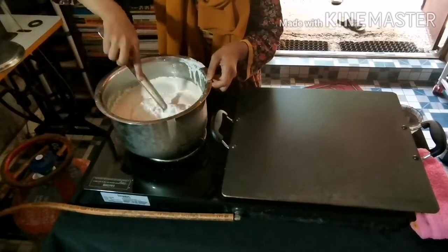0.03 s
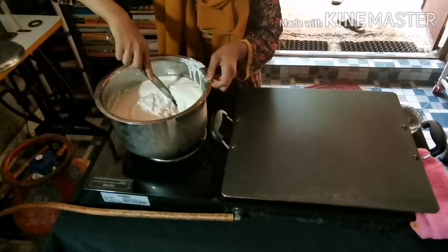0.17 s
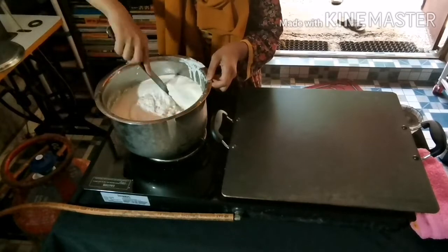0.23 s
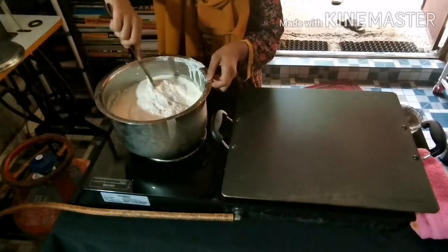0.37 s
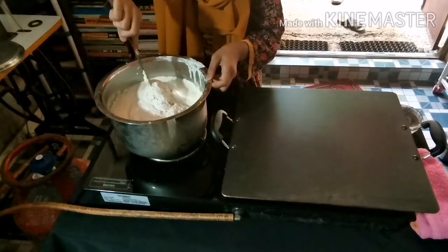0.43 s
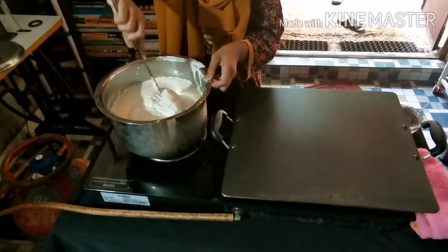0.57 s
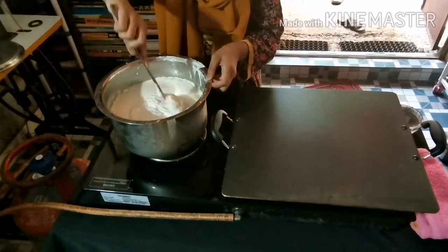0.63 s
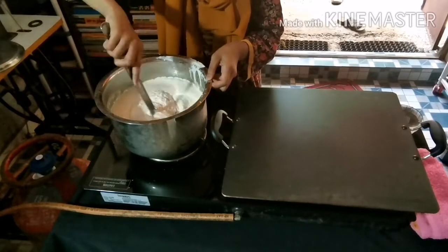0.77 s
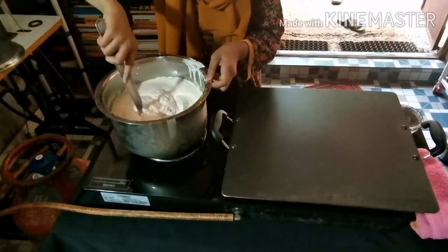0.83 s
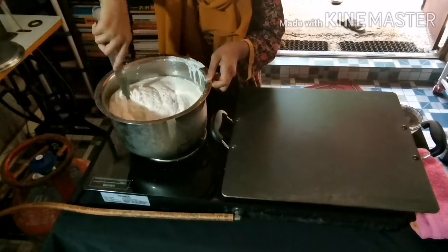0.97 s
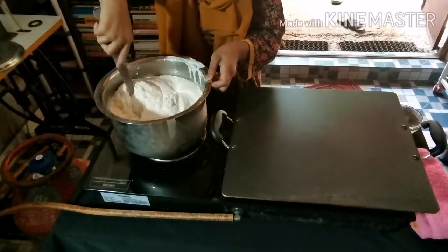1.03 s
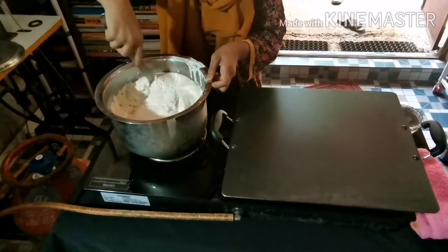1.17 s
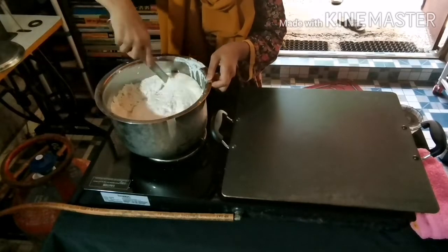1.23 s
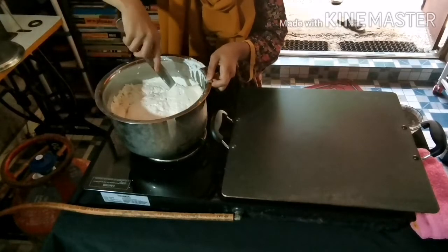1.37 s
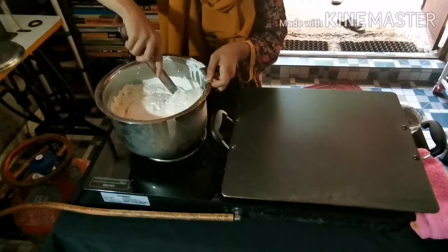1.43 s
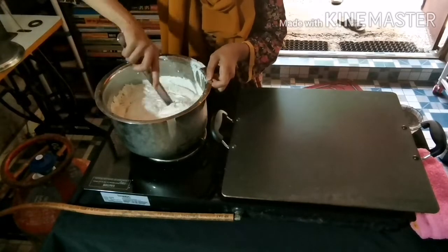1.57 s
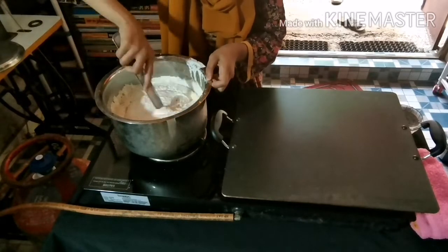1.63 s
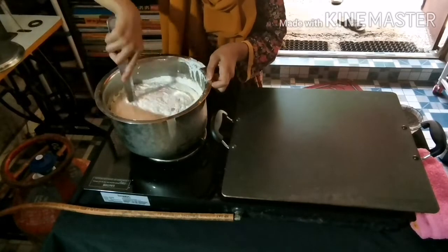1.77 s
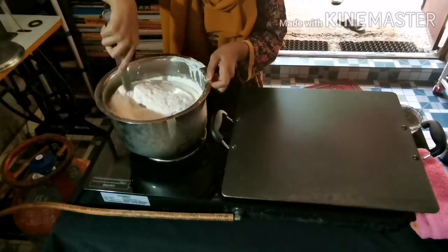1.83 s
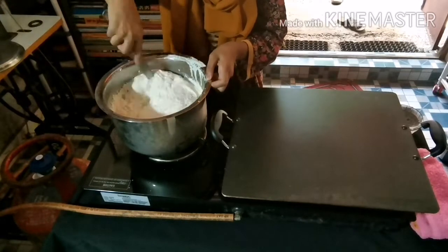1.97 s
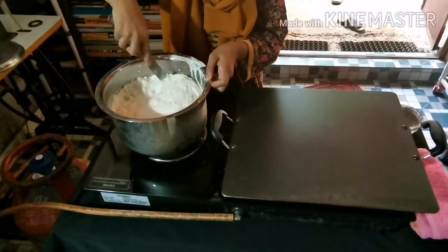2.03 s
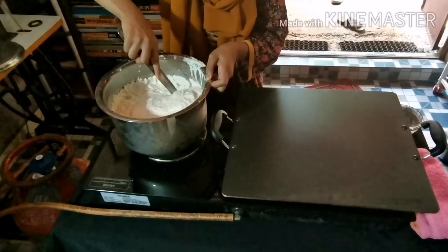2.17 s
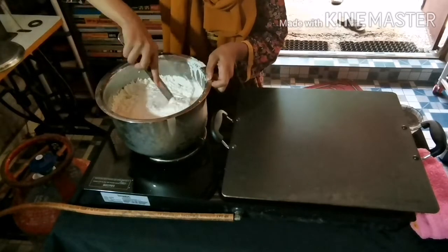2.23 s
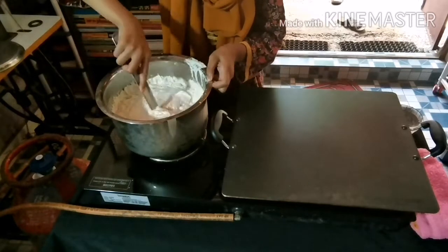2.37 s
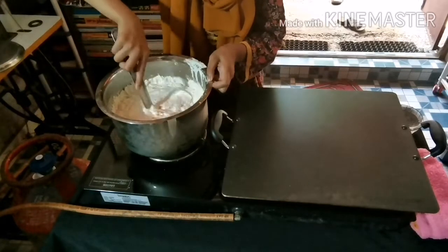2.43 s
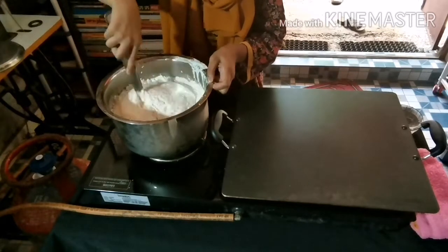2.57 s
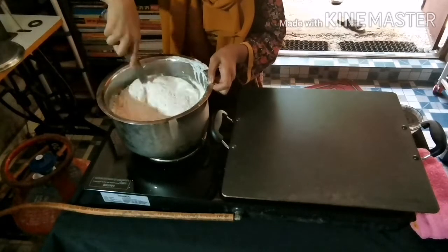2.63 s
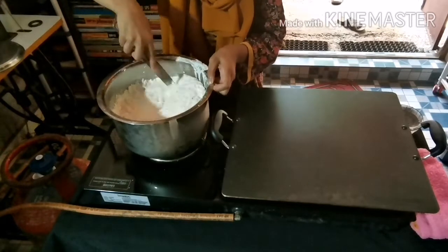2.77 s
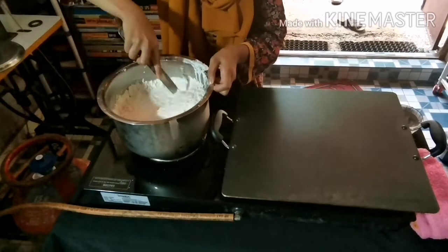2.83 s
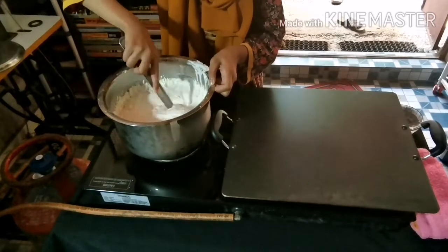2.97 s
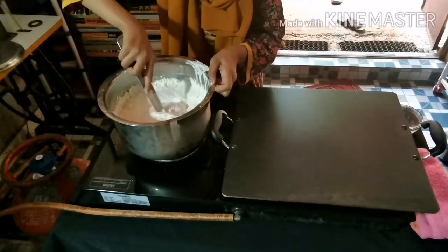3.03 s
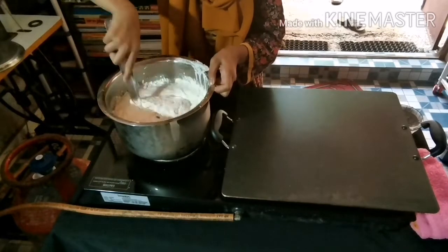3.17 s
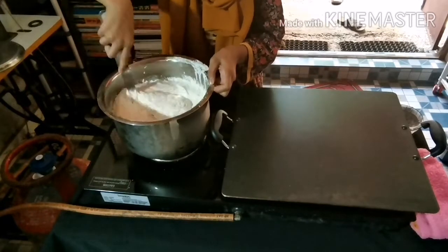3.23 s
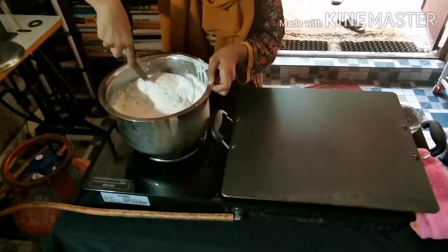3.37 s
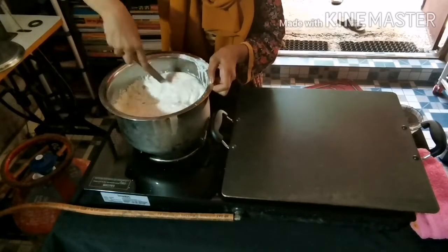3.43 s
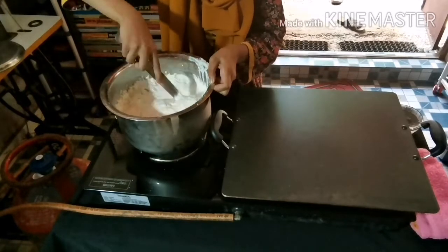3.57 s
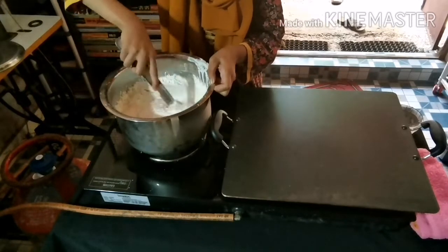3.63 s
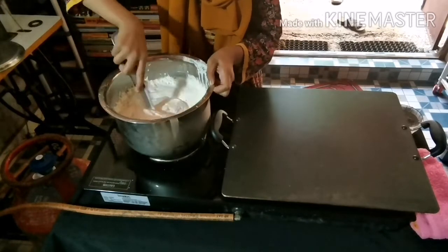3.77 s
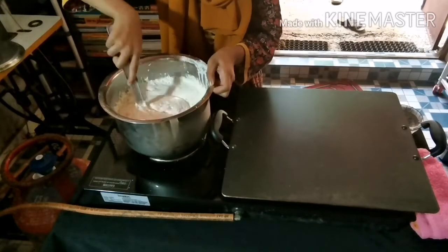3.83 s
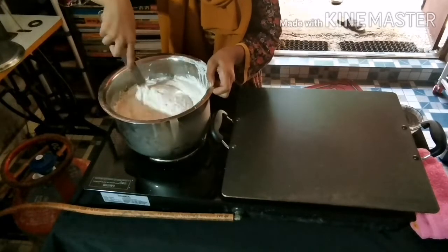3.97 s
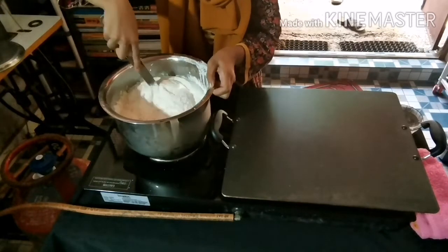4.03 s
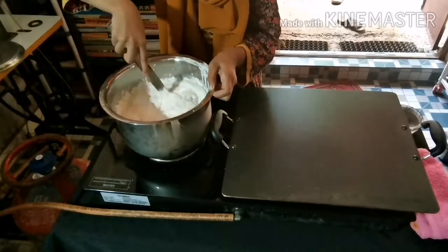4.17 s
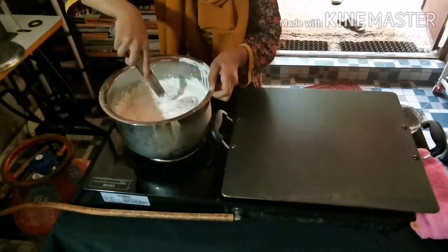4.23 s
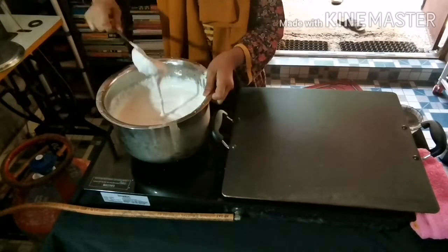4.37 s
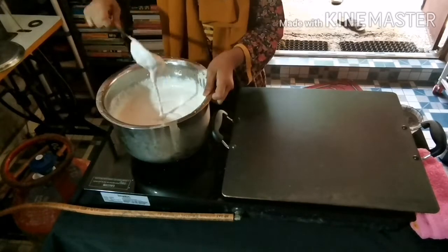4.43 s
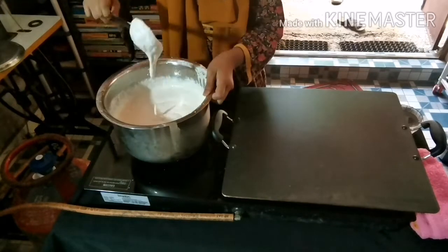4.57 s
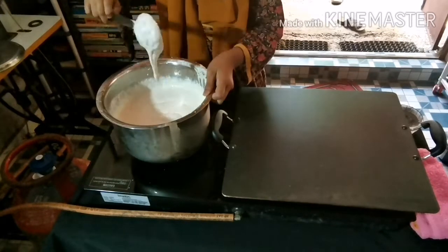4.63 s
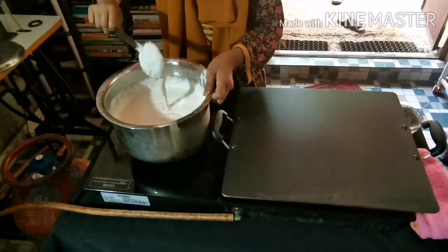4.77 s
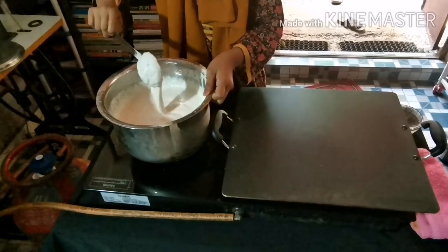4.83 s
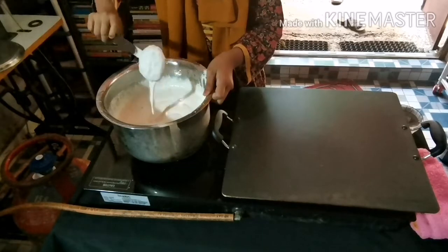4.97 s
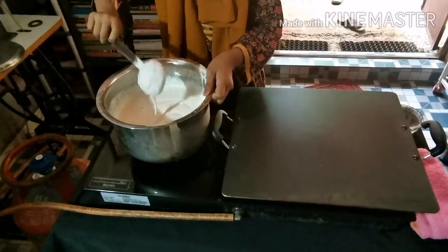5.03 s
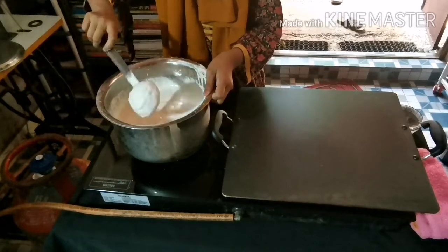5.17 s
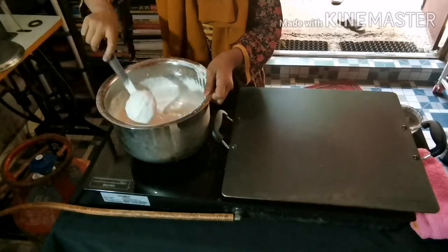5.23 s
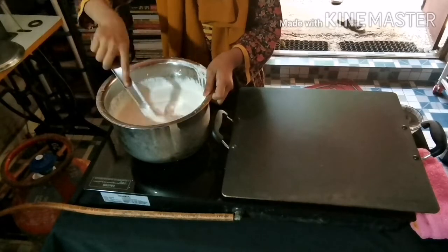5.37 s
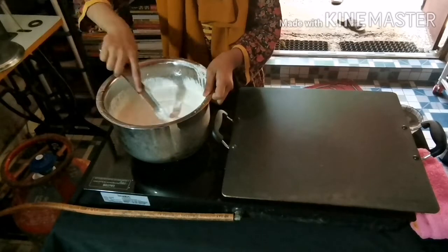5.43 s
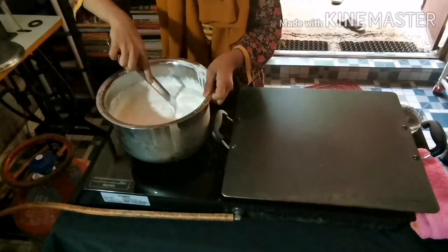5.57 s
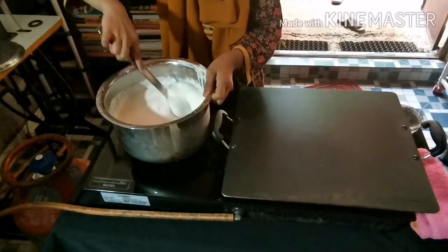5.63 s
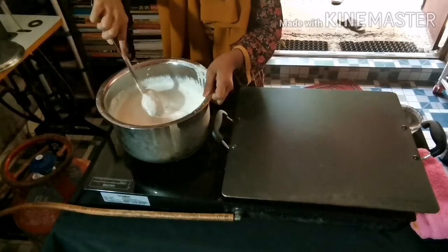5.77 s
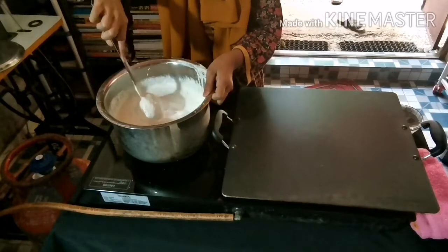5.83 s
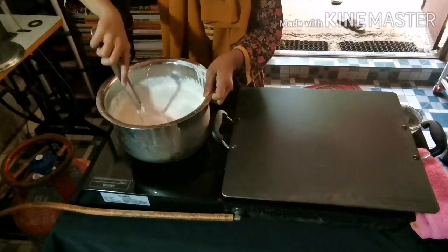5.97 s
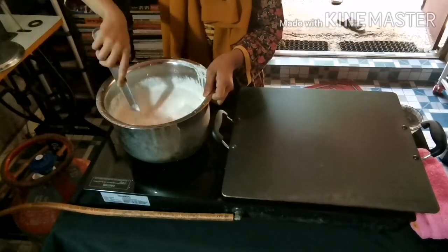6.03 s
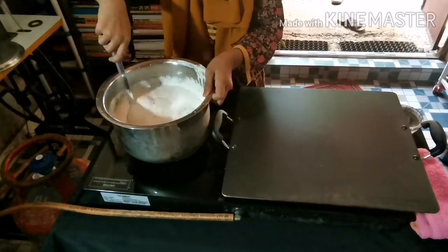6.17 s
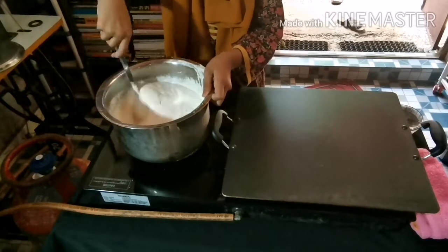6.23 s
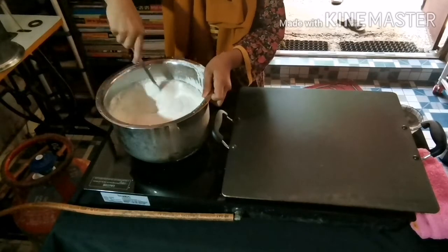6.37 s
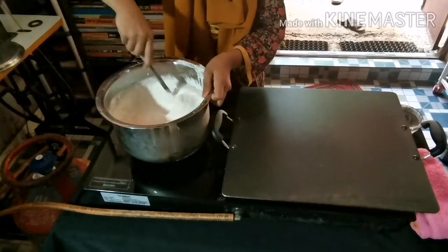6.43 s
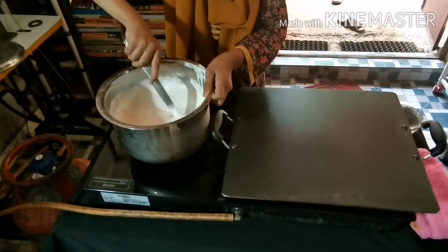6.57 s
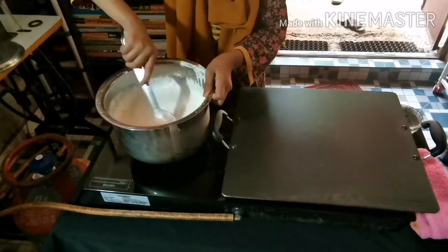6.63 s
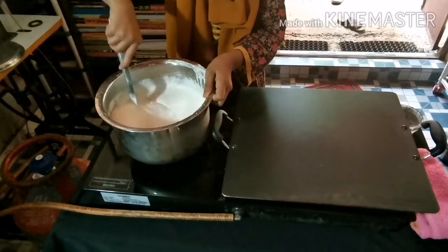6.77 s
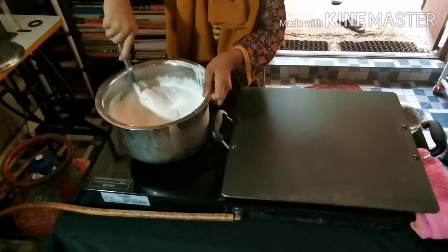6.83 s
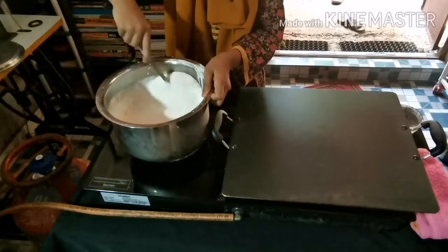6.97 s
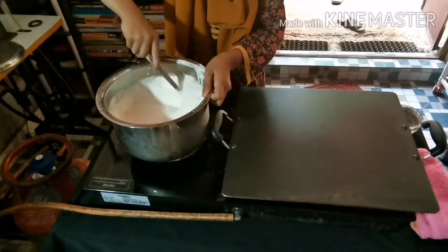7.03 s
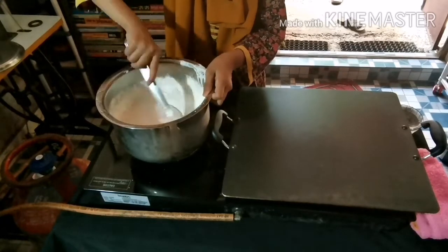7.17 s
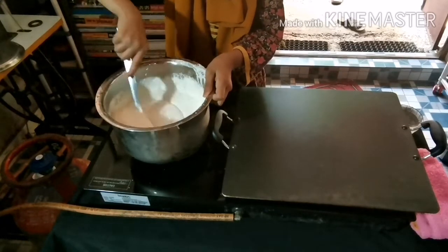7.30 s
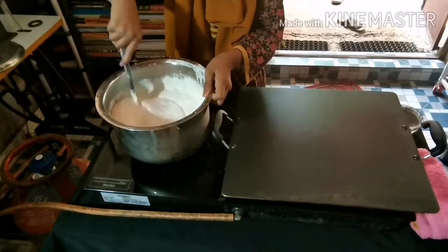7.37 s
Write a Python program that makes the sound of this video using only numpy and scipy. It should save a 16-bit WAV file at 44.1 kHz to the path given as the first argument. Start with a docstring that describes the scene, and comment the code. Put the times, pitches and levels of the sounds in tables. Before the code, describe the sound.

A steel spoon stirs thick batter in a steel pot, making dull, uneven knocks that barely ring. Between them come soft scrapes, thin squeaks, low sloshing and faint sleeve rustle. Past the middle the knocking pauses while batter dribbles back, then returns in a louder, quicker run. The pot sits slightly left of the stereo microphones in a small tiled kitchen with a short echo.

```python
"""Dull knocks, scrapes and thick sloshing: a steel spoon stirs batter in a steel pot on a stove.
The spoon hits the wall and floor of the pot, and the batter stops the ringing almost at once.
Its edge drags and squeaks along the steel; once it is lifted and batter pours back.
Sleeves rustle, the stove sways once, and the small tiled kitchen echoes briefly and murmurs underneath.
Two microphones close together hear it all, with the pot a little to the left."""
import sys
import numpy as np
from scipy import signal
from scipy.fft import rfft, irfft, next_fast_len
from scipy.io import wavfile
from scipy.ndimage import uniform_filter1d

SR = 44100
rng = np.random.default_rng(int(sys.argv[2]) if len(sys.argv) > 2 else 0)


def wrap_up_sound(samples):
    """Save the sound to the file named by the first command line argument, as 16-bit audio."""
    columns = np.atleast_2d(samples).T
    # keep every value between -1 and 1, then stretch to whole-number steps
    tamed = np.clip(columns, -1, 1)
    steps = np.round(tamed * 32767).astype(np.int16)
    wavfile.write(sys.argv[1], SR, steps)


N = 327042

# The tones the filled pot rings with: f/Hz, level/dB, t60/s (the time to fade by 60 dB)
POT_TONES = [(122, -4, .1), (161, 0, .08), (214, 0, .06), (278, -2, .08), (348, -2, .05), (420, 0, .05),
             (480, -2, .04), (565, -3, .04), (662, 0, .05), (785, -2, .04), (875, -3, .03), (1001, -5, .03),
             (1095, -4, .03), (1175, -4, .03), (1497, -3, .025), (1657, -4, .025), (2190, 1, .016),
             (2330, -2, .012), (2573, -3, .012), (3450, -6, .012), (3830, -7, .012), (4264, -11, .03),
             (4980, -10, .012)]
# Strokes of the spoon: t/s, length/s, drag level/dB, centre of the scrape/Hz, slosh level/dB
SPOON_STROKES = [(0.082, 0.16, -64.5, 820, -58), (0.448, 0.087, -78, 790, -72), (.76, 0.08, -76, 800, -64),
                 (0.91, 0.3, -68.5, 850, -62), (1.499, 0.083, -76, 680, -57.5),
                 (1.725, .27, -59.5, 700, -58.5), (2.393, 0.041, -62.5, 716, -62),
                 (2.533, .1, -67.5, 600, -60.5), (2.925, 0.046, -64, 665, -65),
                 (3.031, 0.12, -70, 655, -58.5), (3.161, 0.11, -59.5, 660, -54.5),
                 (3.285, 0.12, -57, 668, -55), (3.586, 0.17, -66, 660, -53), (3.864, 0.037, -62, 635, -62),
                 (4.093, 0.12, -50, 570, -46.5), (4.274, 0.23, -67, 665, -65), (4.57, 0.15, -75, 1050, -69),
                 (4.753, 0.076, -81, 990, -56), (4.868, 0.065, -70, 800, -60),
                 (5.032, 0.25, -79.5, 630, -67), (5.734, 0.028, -79, 745, -81),
                 (5.992, 0.03, -64.5, 560, -57), (6.368, 0.16, -76, 770, -66.5),
                 (6.773, 0.018, -64.5, 705, -53), (7.226, 0.14, -72, 710, -80)]
STROKE_RISE_S, STROKE_T60_S = 0.01, 0.29


def spoon_knocks():
    """Each knock rings the batter-damped pot; where and how hard it lands makes it dull or bright."""
    # Knocks: t/s, body level/dB, then from low to high, relative to the body:
    # stove thump/dB, thud/dB, clank/dB, tick/dB
    hits = [(0.193, -34.5, 9, 3, -1, -40), (0.886, -49.5, -9, -20, -1.5, -13),
            (1.066, -40, 12, -2, -3.5, -35), (1.232, -21.5, -12.5, -2, -1, -4.5),
            (1.763, -56, -20, -18, -2, -24), (1.924, -41, -10, -2, -12, -27), (2.033, -28.5, 0, 7, 1, -1.5),
            (2.222, -53, 12.5, 8, -4, -13), (2.27, -21.5, -39, -14, -0.5, -24),
            (2.655, -40, 15, -4.5, -7, -49), (2.711, -43, -19, -1, -9.5, -24),
            (2.759, -29.5, 0.5, 1.5, -3, -5), (2.898, -44.5, 3, -8, -16, -20),
            (3.155, -34, 1, -22, -12.5, -61), (3.281, -50, -14, -25, -4, -11),
            (3.346, -45, 4.5, 18.5, -3.5, -15), (3.388, -49, 6, 15.5, -19, -21),
            (3.437, -39.5, -10, -5, -18, -21), (3.489, -25, 1, 2.5, 0, -3), (3.509, -39, 1, 13, -1, -1),
            (3.728, -47, 9, 12.5, -9, -19), (3.89, -40, -11, -12.5, -25, -31),
            (3.949, -49, -27, -19, -20, -39), (4.066, -52.5, 30, 13, -6, -29),
            (4.094, -28.5, -18, -14.5, -1, -45), (4.136, -31, -43, 5.5, -7, -38),
            (4.911, -49.5, -7, -29, 7, -19), (5.5, -46.5, 12.5, -8, -0.5, -26),
            (5.766, -54.5, -16, -22, -12, -17), (5.994, -47.5, -23, 3, -25, -39),
            (6.091, -33.5, 11, 0.5, -13.5, -64), (6.239, -27.5, -24, -2.5, 4, -29),
            (6.503, -18.5, 0, 2.5, -5, -10.5), (6.547, -25, -4, -10, -2, -27),
            (6.846, -25.5, 3.5, -43, -13, -5.5), (6.852, -21, 2, -3, 6.5, -14.5),
            (6.917, -28.5, -7, -12, 0.5, -22), (7.054, -17.5, -11.5, -2.5, -6.5, -11),
            (7.103, -25.5, -37, -1, 8, -31), (7.159, -48.5, 21.5, -3.5, -12, -6),
            (7.348, -58.5, 19.5, -1, 3, -24)]
    length = SR // 2
    out, t = np.zeros((2, N + length)), np.arange(length) / SR
    hz, level, t60 = np.transpose(POT_TONES)[:, :, None]
    signs = (-1.) ** np.arange(len(POT_TONES))[:, None]
    for start, body_db, thump_db, thud_db, clank_db, tick_db in hits:
        strength = signs * amp(level + 2 * rng.standard_normal(hz.shape))
        ring = np.sum(strength * amp(-60 * t / t60) * np.sin(2 * np.pi * hz * t), axis=0)
        ring *= 1 - np.exp(-t / (.00003 * amp(-clank_db)))  # batter cushions the dull knocks
        crack = rng.standard_normal(length) * amp(3 - 60 * t / .006)  # the wall's many short-lived tones
        crack[0] += amp(26)  # steel meets steel
        knock_db = 0.45 * clank_db
        hollow_db = (knock_db + clank_db) / 2 - 6.5  # the pot is quiet between knock and clank
        clink_db = 4 + 0.48 * tick_db + 0.52 * clank_db
        colour = [(30, thump_db - 43), (70, thump_db - 10), (130, thump_db), (330, thud_db), (670, 0.33),
                  (1150, knock_db), (1550, hollow_db), (2300, clank_db), (4000, clink_db),
                  (6500, tick_db), (10500, tick_db - 10), (13000, tick_db - 13), (15500, tick_db - 33)]
        blow = amp(body_db - 2.5) * shape_tone(ring + crack, colour)
        out[:, round(start * SR):][:, :length] += from_left(blow) + amp(-2) * kitchen_echo(blow)
    return out[:, :N]


def spoon_drag():
    """The spoon's edge catches in tiny uneven slips; its place on the wall picks which tones sing."""
    # The band of sound around a scrape's centre: f/centre, level/dB
    scrape_band = [(.4, -80), (.8, 4.5), (1, 6), (1.2, -3.5), (3, -15.5), (6, -49)]

    def steel(f):
        """How strongly the pot answers at each frequency: one peak for each of its tones."""
        response = 0
        for k, (hz, db, t60) in enumerate(POT_TONES):
            damping = 1j * f * 1.2 / t60
            response += (-1) ** k * amp(db) * damping / (hz * hz - f * f + damping)
        return response + 2.7  # some of the rubbing passes straight through

    slips = rng.standard_normal(N) * amp(2.5 * rng.standard_normal(N))
    slips *= rng.random(N) < .1  # about one sample in ten slips
    centres_hz = np.array([580, 665, 800, 1100])
    starts, _, _, stroke_hz, _ = np.transpose(SPOON_STROKES)
    current_stroke = np.clip(np.searchsorted(starts, np.arange(N) / SR) - 1, 0, None)
    place = np.interp(stroke_hz[current_stroke], centres_hz, np.arange(len(centres_hz)))
    rub = np.zeros(N)
    for k, centre in enumerate(centres_hz):
        scrape = unit(filtered(slips, lambda f: steel(f) * amp(curve_at(scrape_band, f / centre))))
        rub += np.sqrt(np.clip(1 - abs(place - k), 0, 1)) * scrape  # blend the two nearest places
    rub *= envelope(SPOON_STROKES, column=2, rise_s=STROKE_RISE_S, t60_s=STROKE_T60_S)
    return amp(-6.5) * from_left(rub) + amp(0.5) * kitchen_echo(rub)


def batter_slosh():
    """Thick batter heaves and the pot rocks with each stroke: low, lumpy noise."""
    # Tone colour of the slosh: f/Hz, level/dB
    slosh_colour = [(40, -28), (90, 8.5), (150, 3), (300, 3), (500, -2.5), (900, -36.5)]
    heave = envelope(SPOON_STROKES, column=4, rise_s=STROKE_RISE_S, t60_s=STROKE_T60_S)
    return heave * patchy_noise(slosh_colour, patchy_db=8.5, bins=2, frames=6)


def batter_pour():
    """A ribbon of batter runs off the lifted spoon in small wet smacks, thickens, then breaks off."""
    # Tone colour of the smacks: f/Hz, level/dB
    smack_colour = [(300, -30), (900, -2), (1800, -1.5), (3000, -1), (5000, -10), (8000, -34)]
    start_s, length_s, t60_s = 4.53, 0.29, 0.13
    peak_db, swell_db_per_s = -52.5, 35
    since_break = np.arange(N) / SR - start_s - length_s
    flow_db = np.where(since_break < 0, swell_db_per_s * since_break, -60 * since_break / t60_s)
    smacks = patchy_noise(smack_colour, patchy_db=5, bins=5, frames=4)
    return amp(peak_db + flow_db) * (since_break > -length_s) * smacks


def cloth_rustle():
    """Sleeves and a shawl rustle as the arm moves; a quick slide swishes higher."""
    # Arm movements: t/s, length/s, rustle level/dB, swish level/dB
    moves = [(-.03, 0.098, -57.5, -63), (.2, 0.19, -61, -67), (.43, 0.022, -77, -63.5),
             (.535, 0.1, -63.5, -63.5), (.85, 0.14, -65, -69.5), (1.065, 0.15, -62.5, -62),
             (1.38, 0.26, -71.5, -68), (1.655, 0.035, -65, -62), (1.72, .3, -67.5, -67.5),
             (1.84, .05, -78, -64), (2.18, 0.2, -73, -69), (2.38, 0.12, -58.5, -61.5),
             (2.605, 0.014, -57, -66), (2.68, 0.084, -79, -69), (2.88, 0.064, -74, -76),
             (3.053, 0.012, -80, -64.5), (3.13, 0.19, -70, -66), (3.342, 0.036, -59.5, -65),
             (3.62, .14, -72, -75), (3.77, 0.11, -66.5, -62), (4.2, 0.085, -67, -72),
             (4.288, 0.015, -60, -59.5), (4.53, 0.24, -77, -71.5), (4.77, 0.028, -46, -57),
             (4.91, 0.013, -54, -60), (5.112, 0.032, -60.5, -64.5), (5.302, 0.015, -58.5, -63.5),
             (5.372, 0.026, -60, -67), (5.498, 0.041, -63, -72), (5.76, 0.044, -76, -76),
             (5.86, 0.031, -70, -80), (6.1, 0.19, -73, -69), (6.44, 0.097, -69, -67.5),
             (6.74, 0.09, -69.5, -67), (7.25, 0.07, -78, -71), (7.34, 0.072, -77, -70.5)]
    # Tone colour of the rustle: f/Hz, level/dB
    rustle_colour = [(900, -8.5), (1800, -3.5), (3500, 1), (5000, 0), (6000, -15), (9000, -53)]
    # Tone colour of the swish: f/Hz, level/dB
    swish_colour = [(3000, -22), (5000, -10), (6500, -1), (10500, -3.5), (12500, -6.5), (15500, -22)]
    rise_s, t60_s = 0.0044, .25
    rustle = patchy_noise(rustle_colour, patchy_db=2.5, bins=12, frames=5)
    rustle *= envelope(moves, column=2, rise_s=rise_s, t60_s=t60_s)
    swish = patchy_noise(swish_colour, patchy_db=1.5, bins=32, frames=4)
    swish *= envelope(moves, column=3, rise_s=rise_s, t60_s=t60_s)
    return rustle + swish


def spoon_squeaks():
    """The spoon's edge squeaks in thin, broken tones, some sliding in pitch."""
    # Squeaks: t/s, length/s, starting f/Hz, slide/(Hz per s), relative level/dB
    squeaks = [(.3, .25, 2970, -120, -76), (.86, .2, 2100, -450, -66), (1.55, .25, 2180, 500, -71),
               (2.52, .11, 600, 0, -64), (4.29, .055, 660, 0, -57), (4.38, .09, 675, 0, -59)]
    tone = np.zeros(N)
    for start, length, hz, slide, db in squeaks:
        t = np.arange(N) / SR - start
        fade = np.clip(np.minimum(t, length - t) / 0.0064, 0, 1)
        flutter = unit(filtered(rng.standard_normal(N), lambda f: 1 / (1 + (40 * f / hz) ** 2)))
        tone += fade * flutter * amp(db) * np.sin(2 * np.pi * (hz + slide * t / 2) * t)
    return amp(4) * from_left(tone) + kitchen_echo(tone)


def stove_sway():
    """The stove sways once: a soft, low swell."""
    # The sway: t/s, f/Hz, level/dB, length/s
    sway = (6.88, 54, -50, .2)
    start, hz, db, length = sway
    t = np.arange(N) / SR - start
    swell = np.sin(np.pi * np.clip(t / length, 0, 1)) ** 2
    return amp(db) * swell * np.sin(2 * np.pi * hz * t)


def kitchen_echo(x):
    """The tiled walls throw x back as a short tail; each frequency fades at its own speed."""
    # How long the kitchen rings: f/Hz, t60/s
    ring_times = [(80, 0.29), (210, 0.5), (560, 0.26), (1500, 0.29), (4000, 0.26), (10000, 0.29)]
    # Strength of the echoes, weak in the bass, which escapes: f/Hz, level/dB
    wall_colour = [(60, -6), (150, -4), (400, 2), (1000, 5), (4000, 4), (15000, 6)]
    length = SR // 2
    hz, t, spectra = signal.stft(rng.standard_normal((2, length)), SR, nperseg=256)
    decay = amp(-60 * t / curve_at(ring_times, hz)[:, None])
    tail = signal.istft(spectra * decay, SR, nperseg=256)[1][:, :length]
    fade_in = 1 - np.exp(-np.arange(length) / SR / 0.00022)  # the first walls are close
    tail = from_all_around(tail) * fade_in
    tail = shape_tone(tail / np.linalg.norm(tail[0]), wall_colour)
    return signal.fftconvolve(x[None], tail, axes=1)[:, :len(x)]


def room_murmur():
    """The steady, quiet noise of the kitchen and the street."""
    # Tone colour of the murmur: f/Hz, level/dB
    murmur_colour = [(12, -25), (20, 4.5), (54, -7.5), (232, -9), (382, -12.5), (686, -15.5), (1200, -16),
                     (1540, -23), (2150, -20.5), (4190, -24), (5690, -33), (10800, -29.5), (14300, -40),
                     (15500, -55)]
    return amp(-61) * patchy_noise(murmur_colour, patchy_db=1, bins=6, frames=14)


def from_left(x, lag_s=.0001):
    """Sound straight from the pot reaches the left microphone just before the right one."""
    return filtered(x, lambda hz: np.exp(1j * np.pi * hz * lag_s * np.array([[1], [-1]])))


def from_all_around(pair):
    """Mixes two unrelated signals as close microphones hear a room: alike in the bass, not the treble."""
    # How alike left and right are: f/Hz, likeness (0 unrelated, 1 the same)
    likeness = [(30, .3), (70, .75), (160, .96), (330, .85), (700, .6), (1500, .2), (3000, 0), (15000, 0)]
    angle = lambda hz: np.arccos(np.clip(curve_at(likeness, hz), -1, 1)) / 2
    mid, side = filtered(pair, lambda hz: np.array([np.cos(angle(hz)), np.sin(angle(hz))]))
    return np.array([mid + side, mid - side])


def patchy_noise(colour, patchy_db, bins, frames):
    """Stereo noise with loud and soft patches, `bins` frequency steps wide and `frames` time steps long."""
    spectra = signal.stft(rng.standard_normal((2, N)), nperseg=512)[2]
    patches = uniform_filter1d(rng.standard_normal(spectra.shape[1:]), bins, axis=0)
    patches = uniform_filter1d(patches, frames, axis=1)
    pair = signal.istft(spectra * amp(patchy_db * unit(patches)), nperseg=512)[1][:, :N]
    coloured = filtered(pair, lambda hz: amp(curve_at(colour, hz)))
    return unit(from_all_around(coloured))


def envelope(movements, column, rise_s, t60_s):
    """Loudness over time: each movement rises to the level in `column`, holds, then dies away."""
    t, power = np.arange(N) / SR, np.zeros(N)
    for row in movements:
        start, length = row[:2]
        span = slice(max(round(start * SR), 0), round((start + length + t60_s) * SR))
        age = t[span] - start
        rise = np.clip(age / rise_s, 0, 1)
        fade_db = 60 * np.clip(age - length, 0, None) / t60_s
        power[span] += (rise * amp(row[column] - fade_db)) ** 2
    return np.sqrt(power)


def shape_tone(x, colour):
    """Gives x a tone colour (f/Hz, level/dB) with no ringing ahead of a hit: a minimum-phase filter."""
    size = next_fast_len(x.shape[-1])
    gain = amp(curve_at(colour, np.fft.rfftfreq(size, 1 / SR)))
    cepstrum = irfft(np.log(gain), size)
    cepstrum[1:size // 2] *= 2  # move the part before the hit to after it
    cepstrum[size // 2 + 1:] = 0
    return irfft(rfft(x, size) * np.exp(rfft(cepstrum)), size)[..., :x.shape[-1]]


def filtered(x, response):
    """Multiplies each frequency in x by response(hz)."""
    length = x.shape[-1]
    size = next_fast_len(length + 4096)
    return irfft(rfft(x, size) * response(np.fft.rfftfreq(size, 1 / SR)), size)[..., :length]


def curve_at(points, hz):
    """Reads a value between (f/Hz, value) points, on a logarithmic frequency scale."""
    point_hz, values = np.transpose(points)
    return np.interp(np.log(hz + 1), np.log(point_hz + 1), values)


def amp(db):
    """Turns decibels into a factor to multiply by."""
    return 10 ** (np.asarray(db) / 20)


def unit(x):
    """Scales x to an average strength (rms) of 1."""
    return x / np.sqrt(np.mean(x ** 2) + 1e-20)


def scene():
    """All the sounds added up at the two microphones."""
    stirring = spoon_knocks() + spoon_drag() + batter_slosh() + batter_pour()
    return stirring + cloth_rustle() + spoon_squeaks() + stove_sway() + room_murmur()


def record(dry):
    """Cuts away the very highest treble."""
    return filtered(dry, lambda hz: hz < 15600)


dry = scene()
out = record(dry)
wrap_up_sound(out)
```